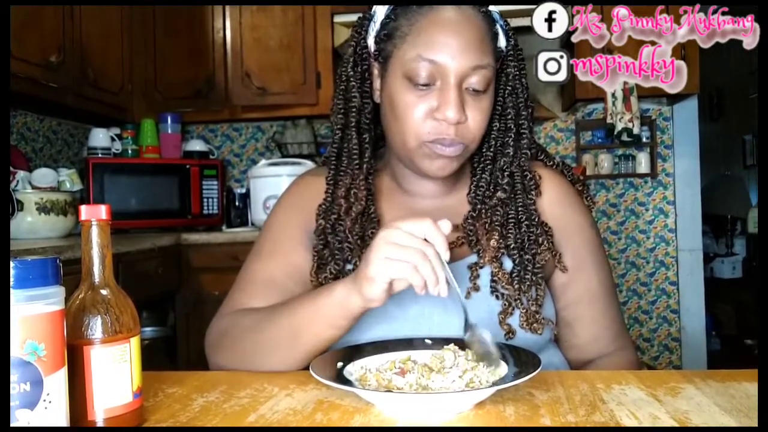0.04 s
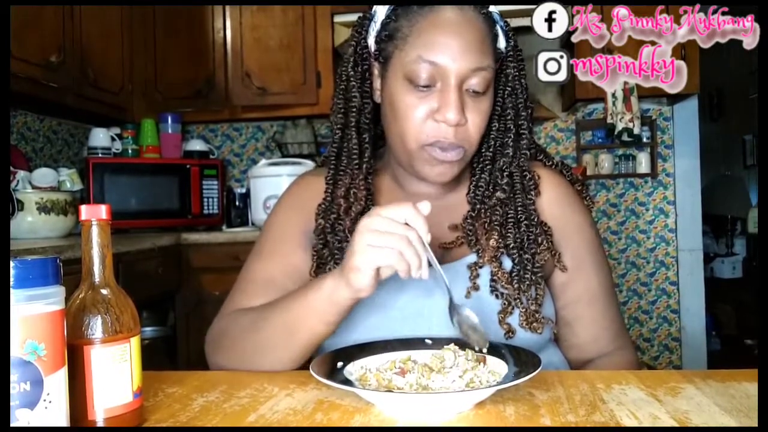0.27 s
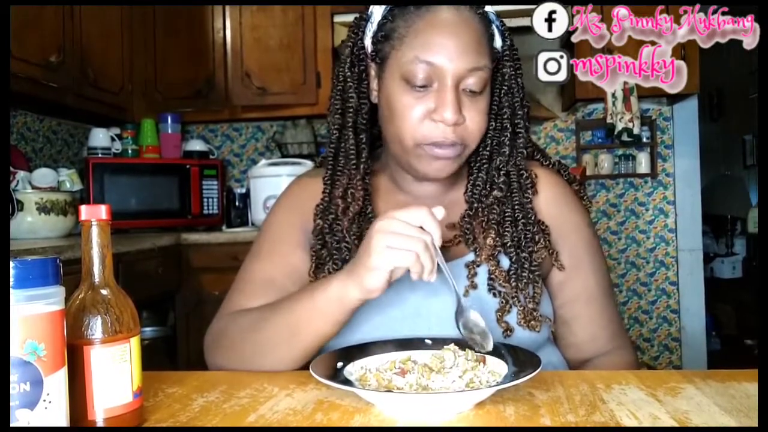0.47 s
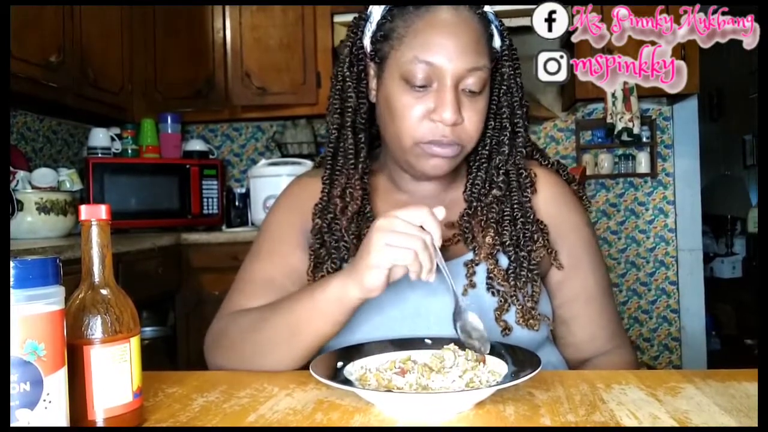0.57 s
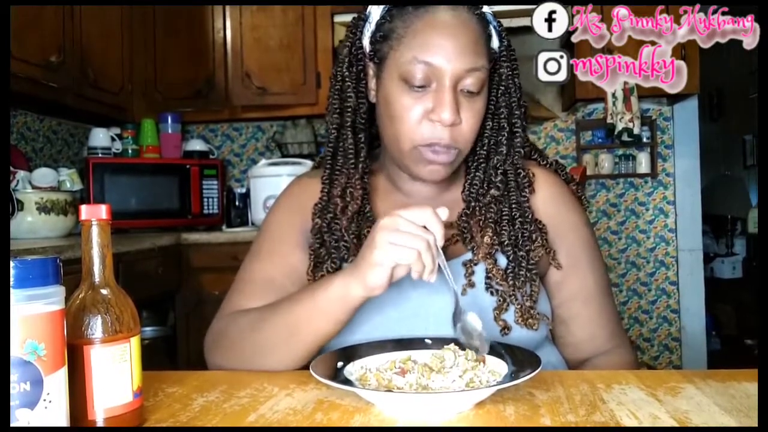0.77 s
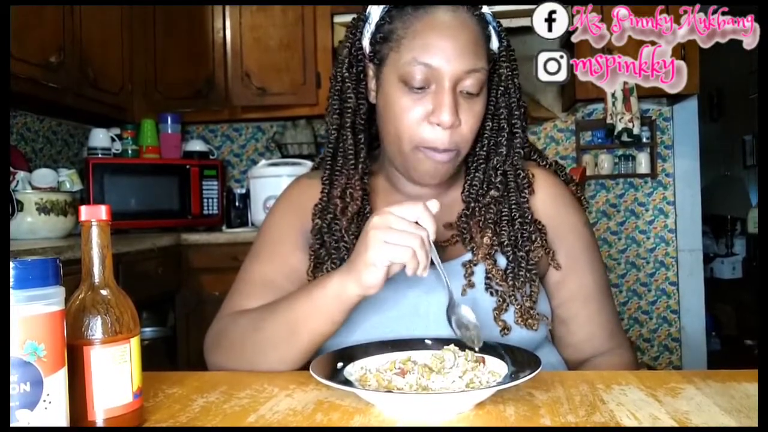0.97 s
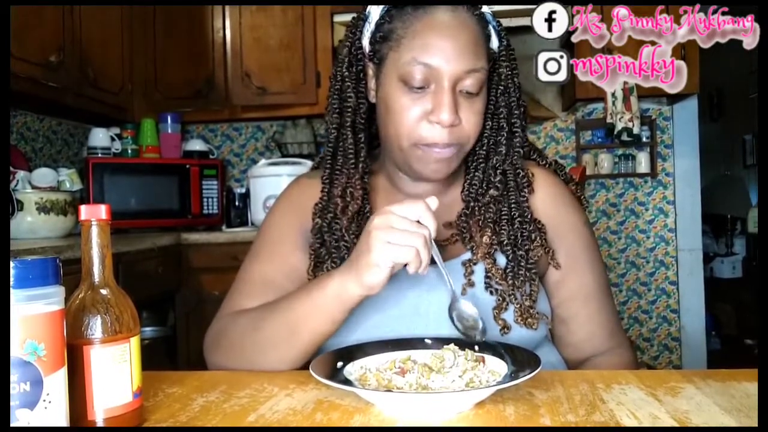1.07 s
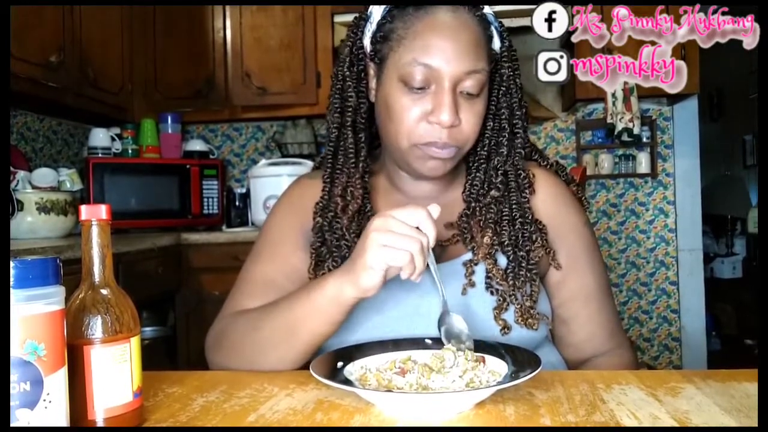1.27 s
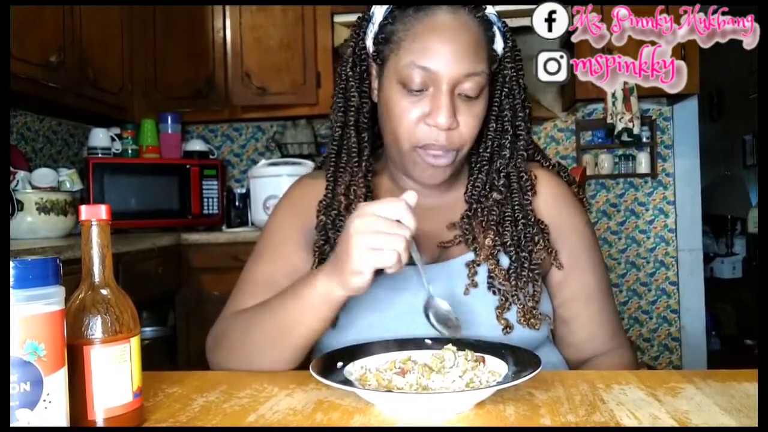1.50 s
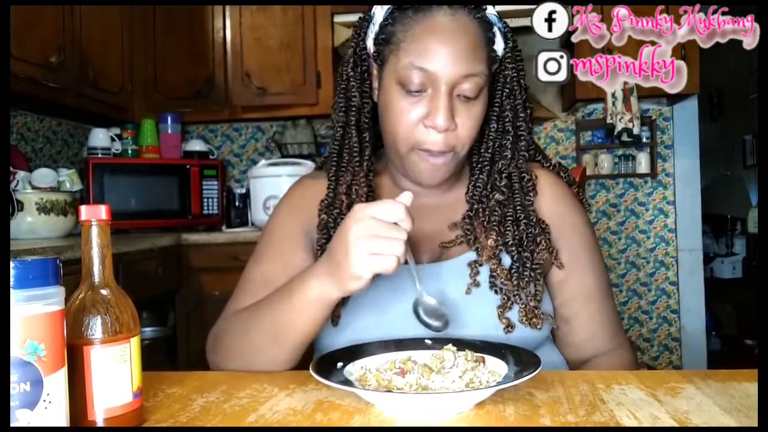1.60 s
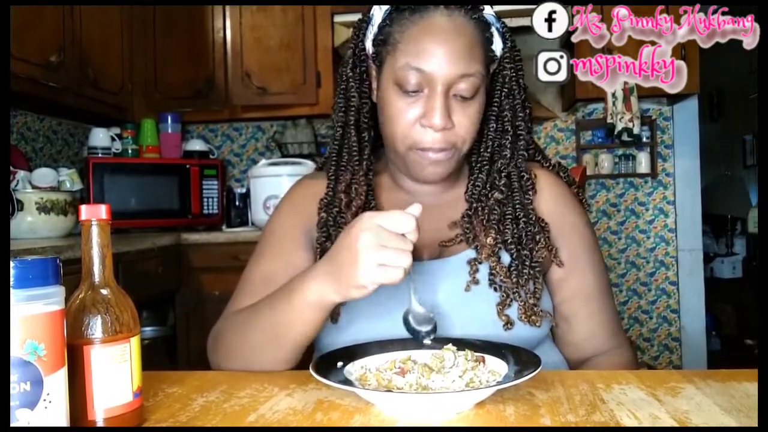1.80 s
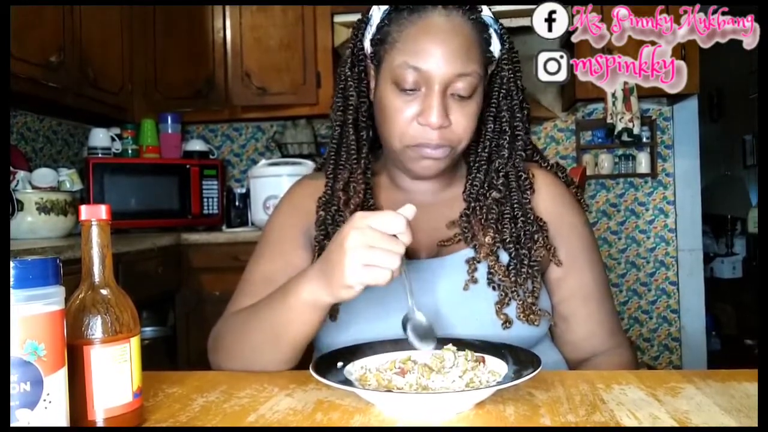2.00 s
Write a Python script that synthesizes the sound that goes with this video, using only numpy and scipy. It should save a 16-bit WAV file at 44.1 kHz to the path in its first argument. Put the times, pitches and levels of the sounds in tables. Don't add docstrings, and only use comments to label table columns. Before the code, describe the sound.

A metal spoon clinks against a glazed bowl of wet food in a quiet kitchen

```python
import sys
import numpy as np
from scipy import signal
from scipy.fft import rfft, irfft
from scipy.io import wavfile
from scipy.ndimage import uniform_filter1d

SR = 44100
rng = np.random.default_rng(int(sys.argv[2]) if len(sys.argv) > 2 else 0)


def unload_wav(signal):
    wavfile.write(
        sys.argv[1],
        SR,
        np.round(np.clip(np.atleast_2d(signal).T, -1, 1) * 32767).astype(np.int16),
    )


def elevation(decibels):
    levels = np.asarray(decibels, float)
    return 10 ** (levels / 20)


N = 90404
LEAD_S = 0.1
M = N + int(LEAD_S * SR)


def level(x, db):
    return x * elevation(db) / np.sqrt(np.mean(x ** 2))


def colour(x, shape):
    hz, db = np.array(shape).T
    f = np.maximum(np.arange(len(x) // 2 + 1) * SR / len(x), 1)
    gain = elevation(np.interp(np.log(f), np.log(hz), db))
    return irfft(rfft(x) * gain, len(x))


def fade(t, t60):
    return (t >= 0) * np.exp(-np.log(1000) * np.maximum(t, 0) / t60)


def walk(rate, size=M):
    k = int(SR / rate)
    smooth = uniform_filter1d(rng.standard_normal(size), k)
    return level(uniform_filter1d(smooth, k), 0)


def ring(age, hzs, dbs, t60s, rough):
    size = int(0.6 * SR)
    live = np.arange(size) / SR
    onset = np.clip(live / 0.023, 0, 1)
    modes = np.zeros(size)
    for hz, db, t60 in zip(hzs, dbs, t60s):
        wobble = 1 + rough * onset * (walk(110, size) + 1j * walk(110, size))
        tone = (np.exp(2j * np.pi * hz * live) * wobble).imag
        modes += elevation(db) * tone * fade(live, t60)
    return np.r_[np.zeros(np.sum(age < 0)), modes, np.zeros(M)][:M]


# (frequency [Hz], ..)
BOWL_HZ = [ (930, 2169, 3396, 3410, 5211, 5835, 6449, 7114, 7140),
           (598, 935, 953, 2172, 3303, 3390, 3410, 4243, 4597, 5186, 5215, 5812, 5841, 6442),
           (853, 890, 1800, 2160, 2620, 3312, 3400, 3600, 4118, 4640, 5233, 6121, 6457, 7698),
           (480, 894, 1701, 2185, 2735, 3300, 3355, 3402, 3585, 3784, 6202, 6461, 6648, 7709),
           (350, 480, 1030, 1793, 2164, 2842, 3483, 3700, 3880, 6320, 6578, 6654, 6864, 7747)]
# (level [dB], ..)
BOWL_DB = [(-19, -15.5, -23.5, -17, -15.5, -21, -25.5, -8.5, -15.5),
           (-23.5, -15.5, -20.5, -8.5, -15.5, -4.5, -8, -15.5, -14, -6, -3.5, 1, -4, -14.5),
           (-11, -10.5, -23.5, -9, -14.5, -1, -2, -12.5, -39, -15, -7.5, -8, -3, -0.5),
           (-12.5, -10.5, -23.5, -11.5, -14.5, -6, -7.5, 2, -5, -16.5, -24.5, -1, -1, -13.5),
           (-15, -19.5, -14, -12, -8, -18.5, -5.5, -18, -11.5, -15, 1, -12, -23, 9)]
# (t60 [s], ..)
BOWL_T60_S = [(0.33, .35, 0.41, 0.55, 0.35, .3, 0.32, 0.13, .23),
              (0.32, 0.31, 0.232, 0.27, 0.13, 0.34, .32, 0.27, .2, .23, 0.14, 0.2, 0.17, .17),
              (0.17, 0.22, 0.27, 0.18, 0.29, 0.23, 0.29, 0.26, .2, .17, .12, 0.055, 0.2, 0.37),
              (0.22, 0.16, 0.34, .33, 0.17, 0.17, 0.14, 0.22, 0.18, 0.33, 0.27, 0.24, 0.073, 0.69),
              (0.12, 0.12, 0.078, 0.15, 0.069, 0.11, 0.078, 0.15, .2, 0.039, 0.046, 0.11, .3, .14)]
# (level [dB], ..)
BLOW_DB = (7, -4, 6, 5.5, 6)


def bowl(age, k):
    blow = 1 + elevation(BLOW_DB[k]) * fade(age, 0.015)
    return ring(age, BOWL_HZ[k], BOWL_DB[k], BOWL_T60_S[k], rough=0.75) * blow


SPOON_HZ = 4406, 5384, 7109, 7144
SPOON_T60_S = 0.35, 0.39, 0.12, 0.22
# (level [dB], ..)
SPOON_DB = [(-4, -5, -35, -26.5), (-12, -17, -1, -2), (-11, -8, -6, -7), (-6.5, -8, -6, -10),
            (-11, -13.5, -23, -21)]


def spoon(age, k):
    return ring(age, SPOON_HZ, SPOON_DB[k], SPOON_T60_S, rough=0.3)


# (frequency [Hz], level per Hz [dB])
CLATTER = [(250, -29), (700, -13.5), (1400, -14), (2500, -8), (3400, -5), (4900, -13), (6300, -7),
           (7900, -13.5)]


def clatter(age, db):
    return level(colour(rng.standard_normal(M), CLATTER), db) * fade(age, 0.25)


THUDS_HZ = 395, 387, 388, 325, 310


def thud(age, db, k):
    half_width_hz = 522 / 2
    edges = [max(THUDS_HZ[k] - half_width_hz, 90), THUDS_HZ[k] + half_width_hz]
    band = signal.butter(2, edges, "band", fs=SR)
    return level(signal.lfilter(*band, rng.standard_normal(M)), db) * fade(age, 0.28)


CRACKS_DB = -40, -12, -22, -24, -4


def crack(t, contact_s, k):
    click = 1.0 * (np.arange(M) == int((contact_s - t[0]) * SR))
    return elevation(CRACKS_DB[k]) * signal.lfilter([1, -1], [1, -0.6], click)


# (time [s], ring [dB], clatter [dB], thud [dB], wait until the food damps the bowl [s])
KNOCKS = [
    (-.03, -28, -38.5, -45, 0.044),
    (0.2123, -11, -17.5, -32, 0.12),
    (0.9219, -22.5, -29.5, -31.5, 0.049),
    (1.3321, -26, -34.5, -33.5, 0.088),
    (1.99, -22, -33, -31, .1),
]
# (level [dB], ..)
DAMPS_DB = (-6.5, -6.5, -0.5, -2.5, -5)


def knocks(t):
    rise_s, damp_s, spoon_damp_share = 0.0021, 0.026, 0.45
    echo_s, echo_db = 0.0128, -9
    out = np.zeros(M)
    for k, (start, ring_db, clatter_db, thud_db, rest_s) in enumerate(KNOCKS):
        age = t - start
        body = elevation(ring_db) * bowl(age, k) + clatter(age, clatter_db)
        body = body + thud(age, thud_db, k) + crack(t, start + rise_s, k)
        metal = elevation(ring_db) * spoon(age, k)
        rest = elevation(DAMPS_DB[k] * np.clip((age - rest_s) / damp_s, 0, 1))
        out += (body * rest + metal * rest ** spoon_damp_share) * np.clip(age / rise_s, 0, 1)
    echo = np.roll(out, int(echo_s * SR)) * (t > t[0] + echo_s)
    low_cut = signal.butter(4, 115, "high", fs=SR, output="sos")
    return signal.sosfilt(low_cut, out + elevation(echo_db) * echo)


# (frequency [Hz], level per Hz [dB])
AIR = [(25, -25.5), (95, -15.5), (125, -7.5), (200, 0), (600, -12), (1300, -16), (3300, -24), (7600, -28),
       (8600, -46.5)]
# (time [s], level [dB])
AIR_FALL = [(0, 1), (.5, 1), (1, 0), (1.5, -1.5), (2.05, -1.5)]


def room_air(t):
    air = rfft(colour(rng.standard_normal(M), AIR))
    octave = np.log2(np.arange(M // 2 + 1) * SR / M + 1)
    bands = np.zeros(M)
    for k in range(4, 15):
        band = irfft(air * np.clip(1 - abs(octave - k), 0, 1), M)
        bands += band * elevation(1 * walk(12))
    return level(bands * elevation(np.interp(t, *np.array(AIR_FALL).T)), -50)


# (frequency [Hz], level [dB])
WHINES = [(700, -67.5), (2095, -71.5), (2960, -70.5)]


def fridge():
    turn = 2 * np.pi * np.cumsum(148.1 * (1 + 0.006 * walk(10))) / SR
    out = level(np.sin(turn) * elevation(1.2 * walk(25)), -51.5)
    for hz, db in WHINES:
        turn = 2 * np.pi * np.cumsum(hz + 6 * walk(44)) / SR
        out += elevation(db + 3 * walk(12)) * np.sin(turn)
    return out


# (time [s], level [dB], frequency [Hz], t60 [s])
TICKS = [(0.047, -23, 7900, 0.0042), (0.096, -41, 2520, 0.018), (.470, -40, 7440, 0.02),
         (.483, -40.5, 4900, .012), (.483, -43, 7200, 0.01), (0.491, -32, 2770, 0.019),
         (.493, -33.5, 3530, 0.0088), (0.51, -44, 7160, .015), (.512, -48, 4370, .04),
         (.514, -59, 5100, 0.025), (0.517, -46, 3470, 0.059), (1.687, -49.5, 4420, 0.037),
         (.610, -40, 7620, .012), (0.908, -48, 3000, .04), (.913, -48, 3900, 0.041),
         (.908, -42.5, 7230, .04), (1.676, -37.5, 2590, 0.029), (1.676, -37.5, 7100, 0.0094),
         (1.679, -45, 4950, .015), (1.71, -37.5, 7340, 0.012), (1.712, -45, 5400, .012),
         (1.725, -42.5, 7340, .014)]


def food_ticks(t):
    out = np.zeros(M)
    for start, db, hz, t60 in TICKS:
        age = t - start
        rough = 0.6 + walk(1800)
        attack = np.clip(age / 0.0004, 0, 1)
        out += elevation(db) * np.sin(2 * np.pi * hz * age) * rough * fade(age, t60) * attack
    return out


# (time [s], length [s], level [dB])
SLIDES = [
    (.204, .01, -46),
    (.485, .065, -52),
    (.64, .15, -53.5),
    (.907, .015, -43),
    (1.675, .07, -56),
]
# (frequency [Hz], level [dB])
SLIDE_COLOUR = [(1000, -30), (1500, -8), (2200, -10), (2750, 0), (3500, -7), (4250, -1), (4800, -8),
                (5400, -4), (7600, -9)]


def food_slides(t):
    out = np.zeros(M)
    for start, length, db in SLIDES:
        grains = rng.standard_normal(M) * elevation(1.9 * walk(130))
        swell = np.sin(np.pi * np.clip((t - start) / length, 0, 1)) ** 0.6
        out += level(colour(grains, SLIDE_COLOUR), db) * swell
    return out


def scene():
    t = np.arange(M) / SR - LEAD_S
    mix = knocks(t) + room_air(t) + fridge() + food_ticks(t) + food_slides(t)
    return mix[None, M - N:]


def roll_off(x):
    return signal.sosfilt(signal.butter(12, 8310, fs=SR, output="sos"), x)


def record(dry):
    fold_hz, fold_db, hiss_db = 8000, -19.5, -86
    narrow = signal.sosfilt(signal.cheby2(14, 75, 8500, fs=SR, output="sos"), dry)
    mirror = narrow * np.cos(4 * np.pi * fold_hz * np.arange(N) / SR)
    edge = signal.butter(4, [fold_hz, fold_hz + 450], "band", fs=SR, output="sos")
    narrow = narrow + elevation(fold_db) * signal.sosfilt(edge, mirror)
    clipped = np.clip(narrow, -1, 1) + elevation(hiss_db) * rng.standard_normal(dry.shape)
    top = signal.ellip(8, 0.1, 60, 16200, fs=SR, output="sos")
    mix = signal.sosfiltfilt(top, clipped)
    return roll_off(mix)


dry = scene()
out = record(dry)
unload_wav(out)
```